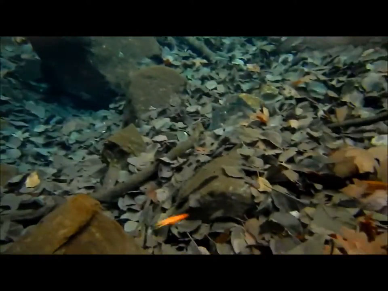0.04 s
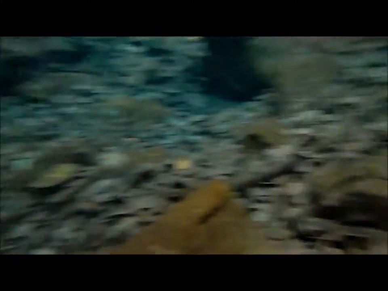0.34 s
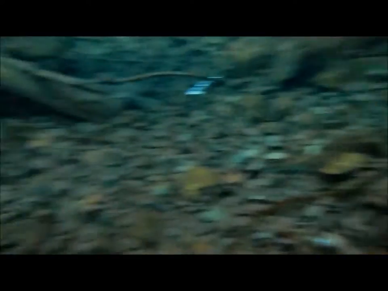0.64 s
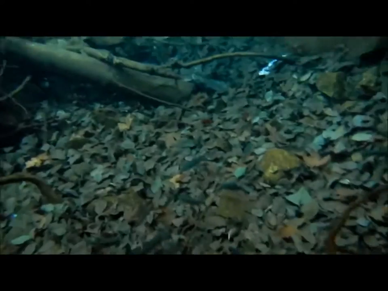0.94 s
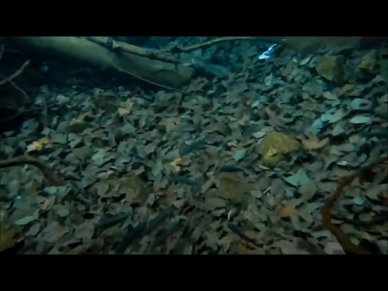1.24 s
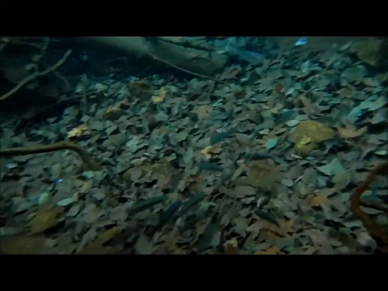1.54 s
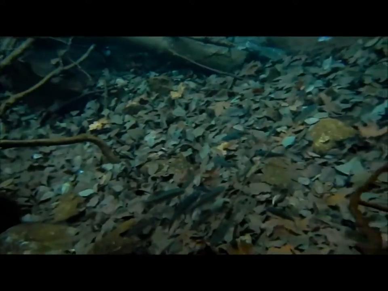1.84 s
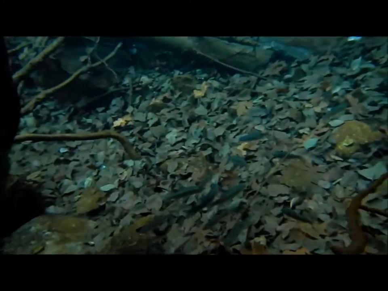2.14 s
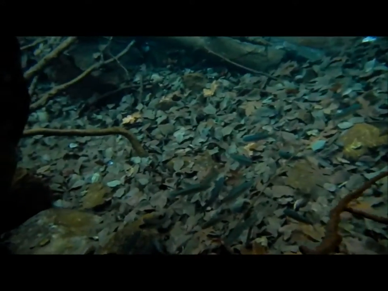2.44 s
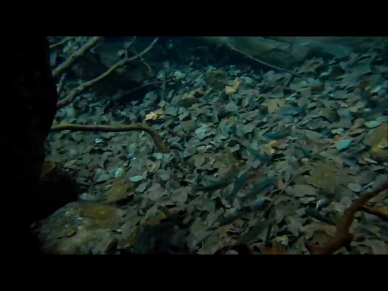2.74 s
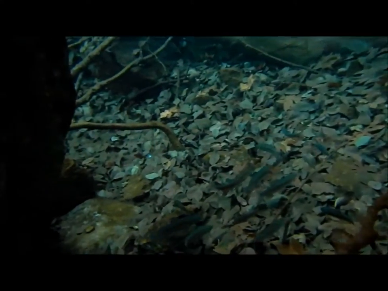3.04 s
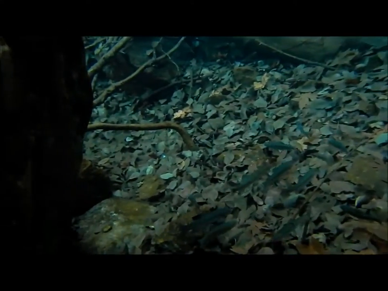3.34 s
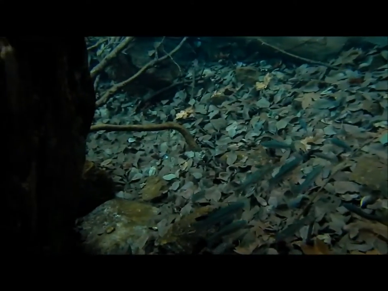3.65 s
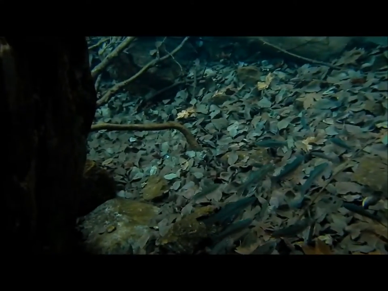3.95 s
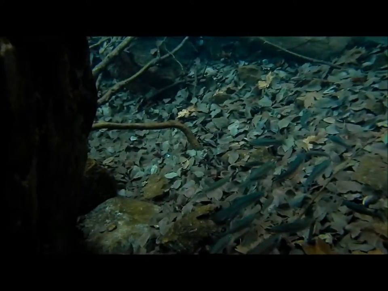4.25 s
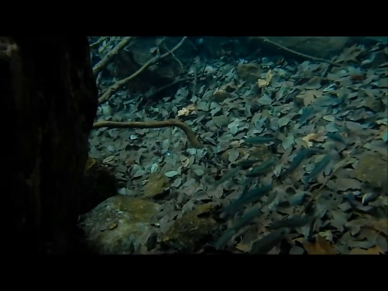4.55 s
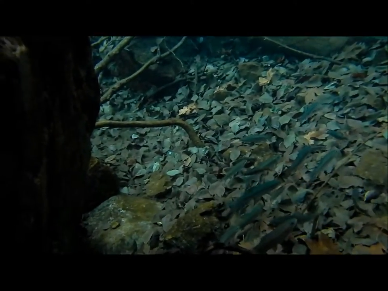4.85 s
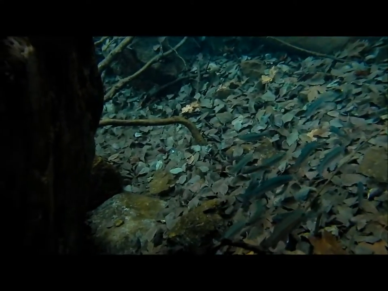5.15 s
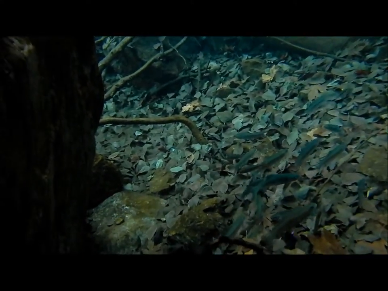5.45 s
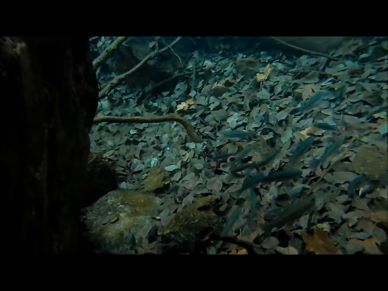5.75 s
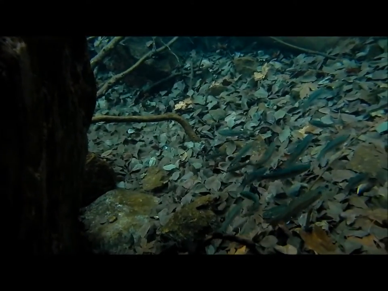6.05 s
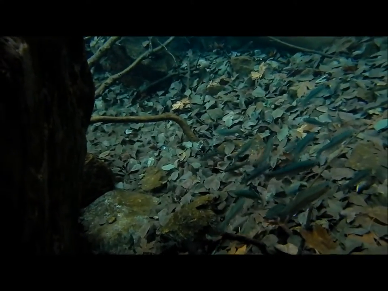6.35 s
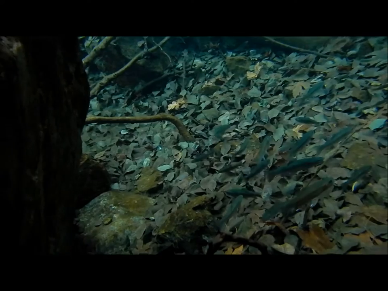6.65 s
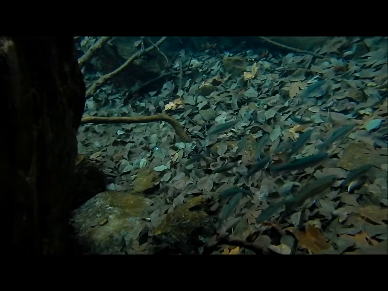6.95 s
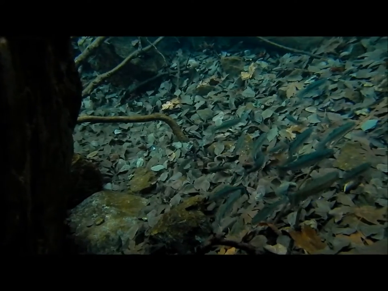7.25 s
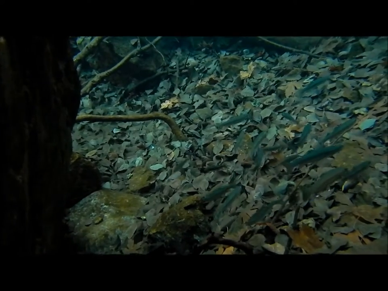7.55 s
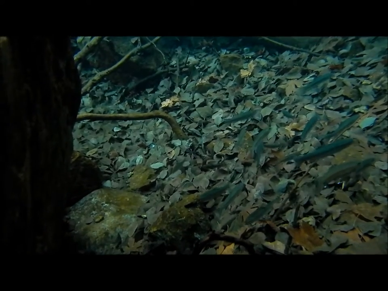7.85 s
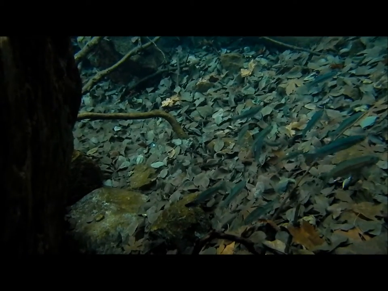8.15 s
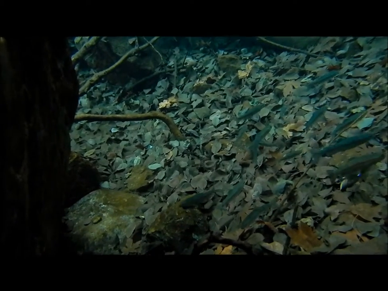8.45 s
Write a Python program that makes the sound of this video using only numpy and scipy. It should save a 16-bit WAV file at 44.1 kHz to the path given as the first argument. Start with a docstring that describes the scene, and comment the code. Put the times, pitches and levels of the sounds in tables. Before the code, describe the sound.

Creek water rushes and gurgles steadily, muffled and hollow, heard underwater from inside a waterproof camera housing. Early on, water swishes past over a low handling rumble, and loud, sharp knocks with a brief rub hit the case, making the sound dip and swell back. Two more knocks follow about a second later. Then the handling settles and small, close bubbles pop here and there, with a faint lens motor ticking on the left.

```python
"""Underwater in a creek

A hand-held camera in a waterproof housing glides under the surface, then rests by a sunken trunk.
Churning water and close bubbles reach its two microphones through the housing's hollow resonances.
The housing rumbles and rubs in the hand, and the lens motor ticks faintly on the left.
A few knocks overload the microphones: the gain control ducks, and the creek swells slowly back."""
import sys
import numpy as np
from scipy import signal
from scipy.fft import rfft, irfft, next_fast_len
from scipy.io import wavfile
from scipy.ndimage import uniform_filter1d, minimum_filter1d, map_coordinates

SR = 44100
rng = np.random.default_rng(int(sys.argv[2]) if len(sys.argv) > 2 else 0)


def output_pcm(signal):
    """Save a mono or channel-first signal as 16-bit PCM at the path in sys.argv[1].

    Samples are clipped to [-1, 1] before scaling.
    """
    pcm = np.clip(np.atleast_2d(signal).T, -1, 1) * 32767
    wavfile.write(sys.argv[1], SR, np.round(pcm).astype(np.int16))


N = 383229
TIME = np.arange(N) / SR
SIZE = next_fast_len(N + SR // 2)
HZ = np.fft.rfftfreq(SIZE, 1 / SR)

# resonances of the housing's shell: (frequency [Hz], width [Hz], left [dB], right [dB])
SHELL_MODES = [(607, 170, -17.5, -18.5), (704, 83, -18.5, -11), (827, 82, -7.5, -28),
               (967, 43, -14.5, -13.5), (1026.6, 142, -8, -2.5), (1332, 73, -14, -17.5),
               (1486, 142, -14.5, -14), (1753, 224, -20, -28.5)]


def amp(db):
    """Decibels to gain."""
    return 10 ** (np.asarray(db) / 20)


def unit(x):
    """x at rms 1."""
    return x / np.sqrt(np.mean(x ** 2) + 1e-20)


def pan(db):
    """Left and right gains, the left louder by db."""
    return amp([[db / 2], [-db / 2]])


def wobble(rate):
    """A smooth random curve, rate knots a second."""
    return map_coordinates(rng.standard_normal(4096), [TIME * rate], mode="wrap")


def strokes(rows, attack_s, release_s):
    """Gain of (time [s], hold [s], level [dB]) movements; 20 dB per attack or release time."""
    power = 0
    for s, hold, db in rows:
        fade = np.maximum(s - TIME, 0) / attack_s + np.maximum(TIME - s - hold, 0) / release_s
        power += amp(db - 20 * np.minimum(fade, 10)) ** 2
    return np.sqrt(power)


def add(track, s, sound):
    """Mix a sound into a track from time s."""
    part = track[..., round(s * SR):][..., :sound.shape[-1]]
    part += sound[..., :part.shape[-1]]


def along(points):
    """(frequency [Hz], value) points joined on a log axis, on the HZ grid."""
    hz, value = np.transpose(points)
    return np.interp(np.log(HZ + 1), np.log(hz), value)


def filtered(x, response):
    """x through a response on the HZ grid."""
    return irfft(rfft(x, SIZE) * response, SIZE)[..., :N]


def resonances(modes):
    """Causal stereo response of (frequency [Hz], width [Hz], left [dB], right [dB]) modes."""
    power = 0
    for hz, width, left, right in modes:
        falloff = 1 + (np.sqrt(2) - 1) * (2 * (HZ - hz) / width) ** 2
        power += (amp([[left], [right]]) / falloff) ** 2
    cepstrum = irfft(np.log(power + 1e-12) / 2, SIZE)
    cepstrum[:, 1:SIZE // 2] *= 2  # folding the cepstrum gives minimum phase
    cepstrum[:, SIZE // 2 + 1:] = 0
    return np.exp(rfft(cepstrum))


def wall(x, hz, order):
    """The thick wall of the housing muffles what lies above hz."""
    return signal.sosfilt(signal.butter(order, hz, fs=SR, output="sos"), x)


def two_ports(source, alike):
    """Both microphone ports hear the share alike of a source's power, each at its own phase."""
    # phase between the ports: (frequency [Hz], lead of the left [rad])
    port_phase = [(60, .2), (220, 0), (310, .45), (480, .2), (620, -2.9), (760, -1.9), (950, 1.1),
                  (1500, 1.1), (1800, 2), (2050, -.5), (4600, -1.5)]
    shared = filtered(source(), np.exp(1j * along(port_phase) * np.array([[.5], [-.5]])))
    separate = np.array([source(), source()])
    return np.sqrt(alike) * shared + np.sqrt(1 - alike) * separate


def churn(count, hz, spread, cycles, size_db, noise_db):
    """A swarm of bubbles over turbulence; each rises in pitch and dies in about cycles periods."""
    start, pitch_draw, size = rng.random((count, 3)).T[:, :, None]
    pitch = hz * np.exp(spread * (2 * pitch_draw - 1))
    t = np.arange(SR // 25) / SR
    age = t * pitch / cycles
    level_db = -size_db * np.log(1 - .99 * size)  # many faint, a few loud
    rings = amp(level_db - 60 * age) * np.sin(2 * np.pi * pitch * t * (1 + age / 8))
    samples = (start * N).astype(int) + np.arange(len(t))
    swarm = np.bincount(samples.ravel(), rings.ravel(), N)[:N]
    return unit(unit(swarm) + amp(noise_db) * rng.standard_normal(N))


def creek():
    """Water all round: large bubbles gurgle in the air cavity, small ones rush in the shell, or fizz."""
    # strength of the creek at the camera: (time [s], gurgle [dB], rush [dB])
    flow = [(0, -30, -29), (.3, -32.5, -32.5), (.65, -26, -27), (1.3, -28, -30.5), (1.9, -28, -31.5),
            (2.4, -29.5, -29), (2.9, -28.5, -30), (3.3, -28, -30.5), (3.65, -28, -31.5), (4.3, -31, -30),
            (4.6, -29, -31), (4.8, -32.5, -30.5), (4.95, -27.5, -31), (5.6, -28, -29.5),
            (6.45, -27.5, -31.5), (7.5, -29, -31), (8.45, -28, -32), (8.69, -30, -29)]
    # pushes of the current on the rush: (time [s], half-length [s], level change [dB])
    surges = [(.52, 0.035, 6.5), (1.702, .16, 6.5), (4.175, 0.054, 3.5), (4.672, 0.022, 3.5),
              (4.98, 0.051, 4.5), (5.644, 0.12, 1), (6.03, 0.019, -0.5), (6.188, 0.031, 3.5),
              (7.49, 0.15, 0.5), (8.61, 0.033, -0.5)]
    # resonances of the air in the housing: (frequency [Hz], width [Hz], left [dB], right [dB])
    cavity_modes = [(128, 190, -12.5, -12.5), (250, 140, -22.5, -14), (374, 75.5, -0.5, 0),
                    (409.2, 46.2, 3, 2.5)]
    # upper resonances of the housing: (frequency [Hz], width [Hz], left [dB], right [dB])
    upper_modes = [(2080, 240, 3, -2), (2730, 760, 0, -0.5), (3690, 510, -5.5, -9), (4000, 230, -13.5, -8),
                   (5330, 240, -14, -14.5)]
    times, *levels = np.transpose(flow)
    gurgle_db, rush_db = (np.interp(TIME, times, db) for db in levels)
    rush_db += sum(db * np.exp(-((TIME - s) / half) ** 2 / 2) for s, half, db in surges)
    fizz_db = -58 + 1.5 * np.exp(-TIME / 2.3)  # a little louder at first
    drift_db = .5 * wobble(5)
    eddies = wobble(15)  # they drive all bubble sizes together
    large = two_ports(
        lambda: churn(count=4000, hz=320, spread=.7, cycles=9, size_db=1.2, noise_db=7), alike=.98)
    small = two_ports(
        lambda: churn(count=4000, hz=1200, spread=.8, cycles=18, size_db=1.3, noise_db=9), alike=.76)
    fine = two_ports(
        lambda: churn(count=1100, hz=2700, spread=.5, cycles=42, size_db=1.7, noise_db=9), alike=.34)
    gurgle = unit(filtered(large, resonances(cavity_modes)) * amp(.21 * eddies + .23 * wobble(1.5)))
    flicker_db = .4 * eddies + 1.3 * wobble(30) + drift_db
    rush = unit(filtered(small, resonances(SHELL_MODES)) * amp(flicker_db))
    fizz = unit(filtered(fine, resonances(upper_modes)) * amp(1.2 * eddies))
    water = amp(gurgle_db) * gurgle + amp(rush_db) * wall(rush, hz=2630, order=3) + amp(fizz_db) * fizz
    return filtered(water, 1 - np.exp(-((HZ - 3200) / 110) ** 2))  # an antiresonance of the wall


def hand_rumble(rest_db=-40.5, unsettled_db=13.5, settle_s=3.7):
    """Handling noise: the camera sways and trembles in a hand that slowly steadies."""
    # resonances of the held camera: (frequency [Hz], width [Hz], left [dB], right [dB])
    held_modes = [(26.2, 19, -1, -5), (61.7, 9.2, 1, -1), (84, 74, -15.5, -19), (151, 70, -23, -27.5)]
    # swings and shifts of the hand: (time [s], hold [s], level [dB])
    sways = [(.2, 0.9, -23), (1.75, 0.23, -31.5), (2.15, 0.41, -28.5), (3.21, 0.018, -29.5),
             (3.48, 0.17, -29.5), (3.95, 0.012, -32.5), (5.4, 0.031, -34.5), (6.42, 0.037, -29),
             (8.1, 0.75, -39.5)]
    shaking = two_ports(lambda: rng.standard_normal(N), alike=.97)
    rumble = unit(filtered(shaking, resonances(held_modes)))
    tremor = amp(rest_db + unsettled_db * np.exp(-TIME / settle_s))
    return np.hypot(tremor, strokes(sways, attack_s=.15, release_s=.45)) * rumble


def microphone_hiss():
    """Faint self-noise, unrelated between the two microphones."""
    # shape of the hiss: (frequency [Hz], relative density [dB])
    spectrum = [(1500, -13), (3300, -1.5), (4400, 2), (7000, -4.5), (10000, -7), (16000, -10.5)]
    return amp(-68.5) * unit(filtered(rng.standard_normal((2, N)), amp(along(spectrum))))


def lens_motor(steps_per_s=15, step_hz=2300, pip_hz=2516):
    """Inside the housing, mostly left: an even train of tiny rattles, clear pips and a raspy ring."""
    # thin pips of the mechanism: (time [s], level [dB])
    pips = [(.102, -47), (.244, -54), (1.025, -40), (1.115, -44), (1.184, -41), (1.228, -41), (1.365, -44),
            (1.39, -46.5), (1.931, -49), (1.972, -44), (2.352, -49), (2.378, -47), (2.781, -55),
            (2.813, -49), (3.274, -51), (3.349, -50), (3.685, -50), (3.731, -50.5), (3.776, -58),
            (4.615, -49.5), (5.424, -54), (5.575, -55), (5.605, -53), (5.657, -54)]
    # spells of raspy ringing: (time [s], hold [s], level [dB])
    rasps = [(1.88, 0.12, -60), (3.25, 0.18, -66.5), (3.68, .25, -60.5), (5.35, .33, -62), (6.2, 0.44, -67)]
    out, middle = np.zeros(N), .02
    t = np.arange(round(2 * middle * SR)) / SR - middle

    def burst(half_s, hz):
        return np.exp(-(t / half_s) ** 2 / 2) * np.sin(2 * np.pi * hz * t)

    for s in np.arange(.022, N / SR, 1 / steps_per_s):
        step_db = -51 - 2.5 * s  # the steps fade as the camera steadies
        for late, detune, size in rng.uniform(-1, 1, size=(5, 3)):  # five grains a step
            grain = burst(half_s=.0033, hz=step_hz + 110 * detune)
            add(out, abs(s + .009 * late - middle), amp(step_db + 3 * size) * grain)
    for s, db in pips:
        add(out, s - middle, amp(db) * burst(half_s=.0064, hz=pip_hz))
    ring = filtered(rng.standard_normal(N), resonances([(pip_hz, 50, 0, 0)]))[0]
    rasp = unit(ring * np.sin(np.pi * steps_per_s * TIME))
    effort = np.hypot(strokes(rasps, attack_s=.1, release_s=.1), amp(-69))  # never quite at rest
    return amp([[3], [-10]]) * (out + effort * rasp)


def wake(pitch_sag=.17):
    """Bubbly water sweeps along the housing as it turns, louder and higher with the speed."""
    # turns and drifts: (time of top speed [s], half-length [s], level [dB], top pitch [ratio])
    turns = [(0.522, 0.23, -32.5, 1), (1.245, .2, -38.5, 0.87), (1.779, 0.2, -36, 0.94),
             (2.552, 0.49, -38.5, .9), (3.699, 0.63, -44.5, .84), (5.08, 0.084, -43, 0.82)]
    bubbles = two_ports(
        lambda: churn(count=2500, hz=1650, spread=.3, cycles=30, size_db=2.5, noise_db=-1), alike=.65)
    wash = unit(filtered(bubbles, resonances([(1470, 110, 1, .12), (1763, 180, 2.5, .5)])))
    out = np.zeros((2, N))
    for s, half, db, pitch in turns:
        speed = 1 / (1 + ((TIME - s) / half) ** 6)
        warped_time = np.cumsum(pitch * (1 - pitch_sag * (1 - speed))) / SR
        out += amp(db) * speed * np.array([np.interp(warped_time, TIME, port) for port in wash])
    return out


def grip_rubs():
    """The grip slips on the housing, and the friction excites its low modes."""
    # slips of the grip: (time [s], hold [s], level [dB])
    rubs = [(.5, 0.42, -35), (.705, 0.053, -23), (.928, 0.014, -5.5), (.939, .003, -2), (.952, 0.0041, -1),
            (.966, 0.01, -10.5), (.99, 0.04, -14), (1.11, 0.06, -16.5), (2.06, 0.034, -24)]
    # rubbed resonances: (frequency [Hz], width [Hz], left [dB], right [dB])
    rub_modes = [(206, 180, 1.5, -14), (367, 79, 7, 2), (473, 71, -1, .5), (806, 190, 2.5, -5.5),
                 (1090, 160, -5, -6)]
    friction = two_ports(lambda: rng.standard_normal(N), alike=1)
    slip = unit(filtered(friction, resonances(rub_modes)))
    return strokes(rubs, attack_s=.011, release_s=.042) * wall(slip, hz=1500, order=6)


def knocks(blunt_s=.00003, onset_s=.0001, rebound_t60=.028, crack_t60=.0077):
    """Blows right by the microphones: a pressure spike, a damped rebound, a crack; the shell rings."""
    # hard contacts on the housing: (time [s], spike [dB], push or pull [+1, -1], spike life [s],
    # rebound [dB], rebound pitch [Hz], left minus right [dB], crack [dB])
    blows = [(0.7385, 1, -1, 0.00024, -19, 620, -1, -30), (0.879, 9, 1, 0.00024, -3, 330, 10.5, -47),
             (.881, 13, -1, 0.00052, 3, 430, 3.5, -21), (2.0846, 1.5, -1, 0.00029, -7, 650, 5.5, -42.5),
             (2.085, 2, -1, 0.00017, -4.5, 770, 10, -25), (2.243, 1.5, 1, 0.00056, -6, 130, -20.5, -55),
             (2.2475, 3.5, 1, 0.00021, -20, 140, -15, -27), (4.699, -12, -1, 0.00024, -35, 445, -11, -47.5),
             (5.7227, -13.5, -1, 0.00012, -11, 336, -13.5, -38),
             (8.5834, -17, -1, 0.00051, -18.5, 335, -13, -62)]
    thuds, cracks = np.zeros((2, N)), np.zeros((2, N))
    lead_s = .008  # room for the spike's rise
    t = np.arange(SR // 4) / SR - lead_s
    after = np.maximum(t, 0)
    for s, spike_db, push, life, rebound_db, hz, pan_db, crack_db in blows:
        spike = amp(spike_db) * np.exp((blunt_s - np.hypot(t, blunt_s)) / life)
        envelope = amp(rebound_db - 60 * after / rebound_t60) * (1 - np.exp(-after / onset_s))
        rebound = -envelope * np.sin(2 * np.pi * hz * after)
        add(thuds, s - lead_s, push * pan(pan_db) * (spike + rebound))
        crack = (t > 0) * amp(crack_db - 60 * after / crack_t60) * rng.standard_normal((2, len(t)))
        add(cracks, s - lead_s, crack)
    direct = wall(thuds, hz=2100, order=4) + amp(-12.5) * thuds + wall(cracks, hz=4000, order=1)
    return direct + amp(3) * filtered(thuds, resonances(SHELL_MODES))


def hand_bumps(cycles=3.5, onset_s=.0009):
    """The hand nudges the housing, which rocks for a few slow cycles."""
    # soft nudges: (time [s], level [dB], rocking frequency [Hz])
    nudges = [(0.745, 0, 43.7), (.893, 4, 45.7), (1.05, 2.5, 81)]
    out, t = np.zeros(N), np.arange(SR // 4) / SR
    for s, db, hz in nudges:
        envelope = amp(db - 60 * t * hz / cycles) * (1 - np.exp(-t / onset_s))
        add(out, s, envelope * np.sin(2 * np.pi * hz * t))
    return pan(5) * out


def near_bubbles(rise=.078, onset_s=.0014):
    """Single bubbles close to the microphones ring briefly, gliding up a little."""
    # close bubbles: (time [s], level [dB], pitch [Hz], 60 dB decay [s])
    bubbles = [(1.721, -16, 1000, 0.039), (3.083, -9, 1000, 0.019), (3.186, -22, 1010, .03),
               (4.35, -16.5, 364, 0.076), (4.355, -21.5, 137, 0.11), (4.519, -15.5, 1034, .03),
               (4.659, -15.5, 960, 0.039), (5.2152, -33, 2440, 0.032), (5.2162, -15.5, 1050, .018),
               (5.311, -16.5, 1038, 0.066), (5.369, -18, 990, .03), (5.482, -11, 990, 0.038),
               (5.7207, -2.5, 348, 0.037), (5.7213, -5.5, 1285, 0.047), (6.027, -10.5, 1027, 0.031),
               (6.15, -23, 1020, 0.025), (6.482, -14, 984, 0.025), (6.598, -22, 950, 0.037),
               (7.467, -18, 1045, 0.042), (7.531, -19.5, 1050, 0.035), (7.596, -14, 1016, 0.027),
               (7.857, -18.5, 1017, 0.034), (8.304, -11.5, 362, 0.051), (8.433, -15, 411, 0.12),
               (8.455, -15, 406, 0.11)]
    out, t = np.zeros(N), np.arange(SR // 8) / SR
    for s, db, hz, t60 in bubbles:
        age = t / t60
        ring = np.sin(2 * np.pi * hz * t * (1 + rise * np.minimum(age, 1) / 2))
        add(out, s, amp(db - 60 * age) * (1 - np.exp(-t / onset_s)) * ring)
    return out


def grit_ticks(t60=.034, onset_s=.0006):
    """Grains of grit tap the housing: short bright bursts."""
    # taps of grit: (time [s], level [dB], centre [Hz], width [Hz])
    taps = [(5.2143, -28.5, 2330, 547), (5.2155, -43, 3850, 800), (5.2153, -49, 5230, 500),
            (7.293, -44, 3970, 450)]
    out, t = np.zeros((2, N)), np.arange(SR // 20) / SR
    for s, db, hz, width in taps:
        band = signal.butter(2, [hz - width / 2, hz + width / 2], "bandpass", fs=SR, output="sos")
        burst = unit(signal.sosfilt(band, rng.standard_normal((2, len(t)))))
        add(out, s, amp(db - 60 * t / t60) * (1 - np.exp(-t / onset_s)) * burst)
    return wall(out, hz=6500, order=3)


def gain_control(x, ceiling_db=-6.4, start_db=-15.5, recovery_db_per_s=17.5):
    """The camera's gain starts low, ducks at once on overloads and climbs steadily back."""
    peak_db = 20 * np.log10(abs(x).max(axis=0) + 1e-9)
    allowed_db = np.minimum(ceiling_db - peak_db, 0)
    allowed_db[0] = start_db
    ramp = recovery_db_per_s * TIME
    gain_db = ramp + np.minimum.accumulate(minimum_filter1d(allowed_db, size=96) - ramp)
    gain_db = uniform_filter1d(uniform_filter1d(gain_db, size=48), size=48)  # a soft attack
    return x * amp(gain_db)


def quiet_treble_fade(x, hz=4500, threshold_db=-71):
    """Faint high hiss dies away whenever the sound goes quiet."""
    treble = filtered(x, 1 - 1 / (1 + (HZ / hz) ** 16))
    power = uniform_filter1d(np.mean(treble ** 2, axis=0), size=512)
    treble_gain = np.minimum(np.sqrt(abs(power)) / amp(threshold_db), 1)
    return x - treble * (1 - treble_gain)


def scene():
    """Everything at the two microphones, inside the housing under the surface."""
    water = creek()
    handling = hand_rumble() + wall(grip_rubs() + wake(), hz=1970, order=12)
    impacts = knocks() + hand_bumps() + grit_ticks()
    return water + handling + impacts + near_bubbles() + lens_motor() + microphone_hiss()


def record(dry, top_hz=15750):
    """A low cut and gain control; faint treble fades in the quiet, and nothing sounds above top_hz."""
    low_cut = signal.sosfilt(signal.butter(1, 14, "highpass", fs=SR, output="sos"), dry)
    fade_out = np.minimum((TIME[-1] - TIME) / .004, 1)
    return filtered(quiet_treble_fade(gain_control(low_cut) * fade_out), HZ < top_hz)


dry = scene()
out = record(dry)
output_pcm(out)
```